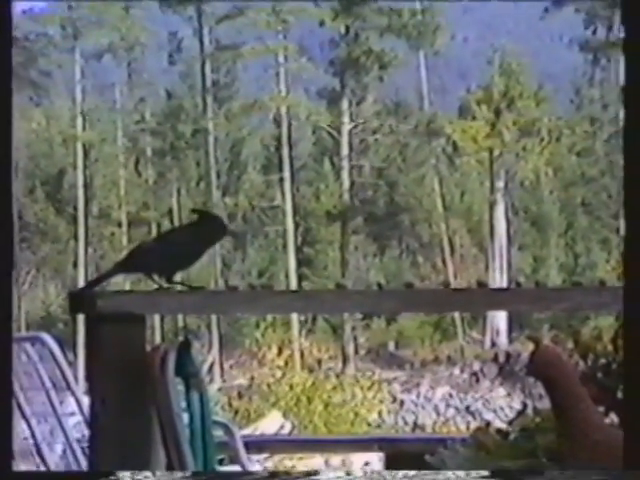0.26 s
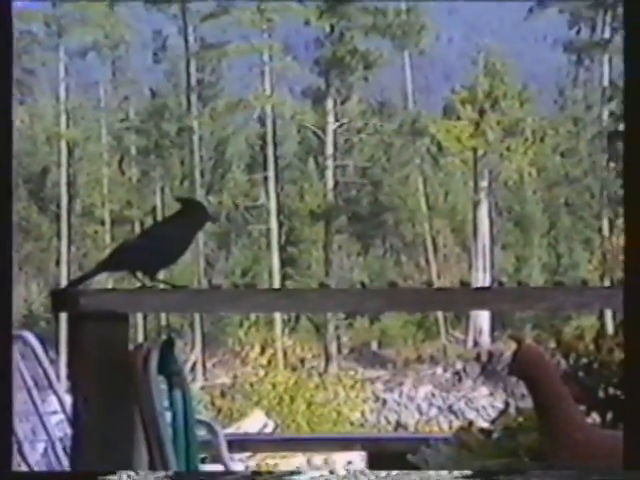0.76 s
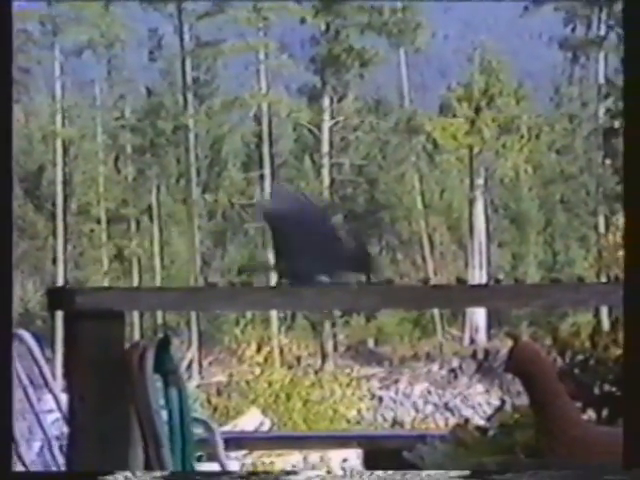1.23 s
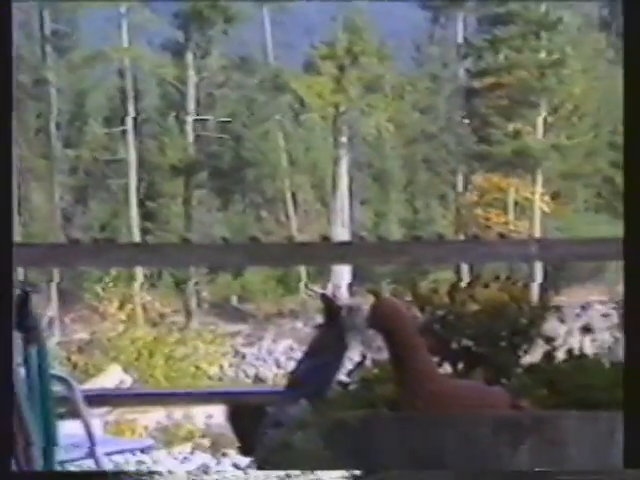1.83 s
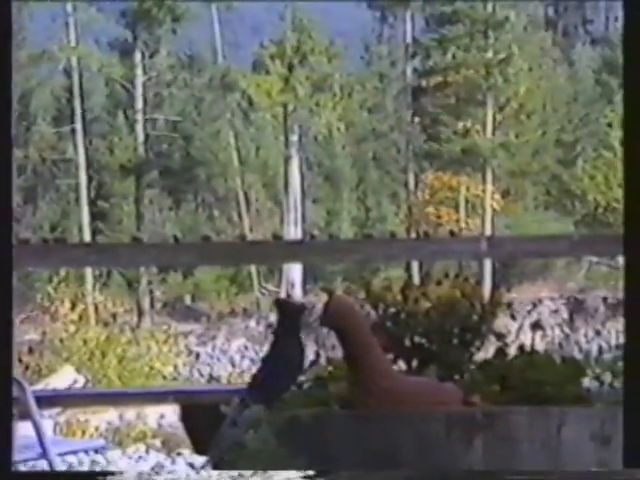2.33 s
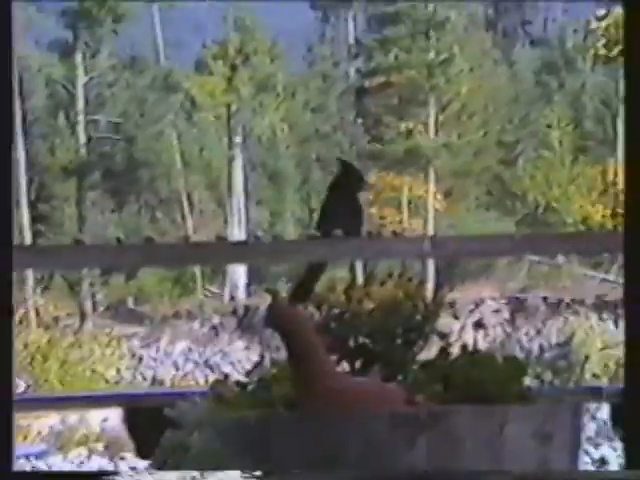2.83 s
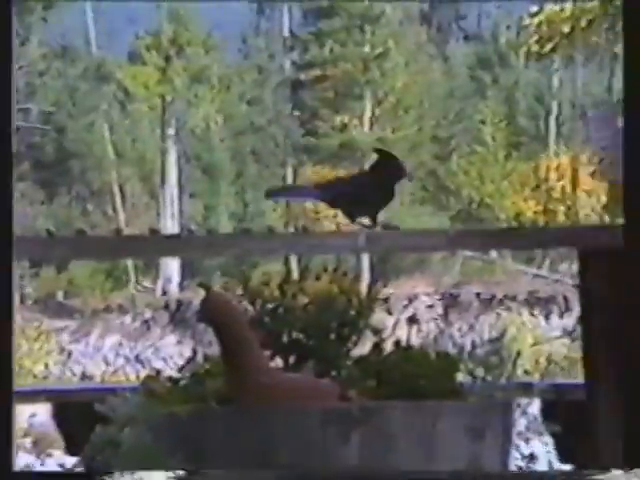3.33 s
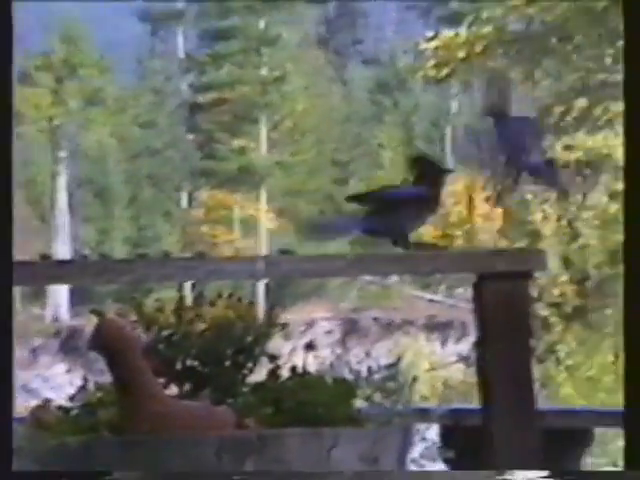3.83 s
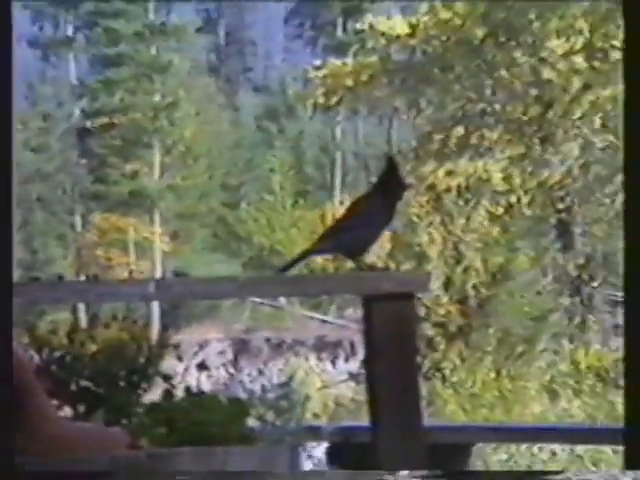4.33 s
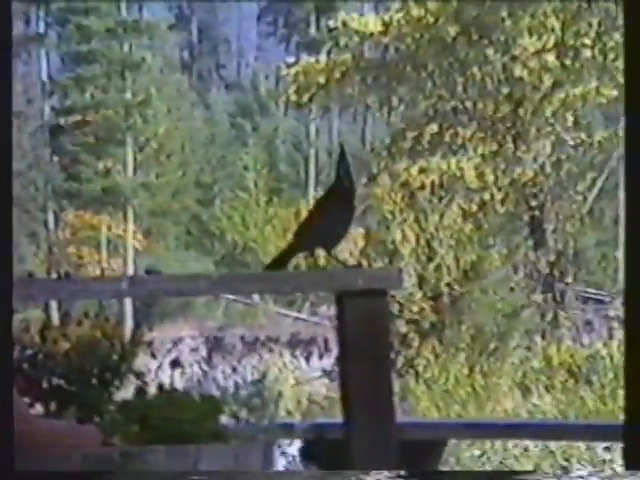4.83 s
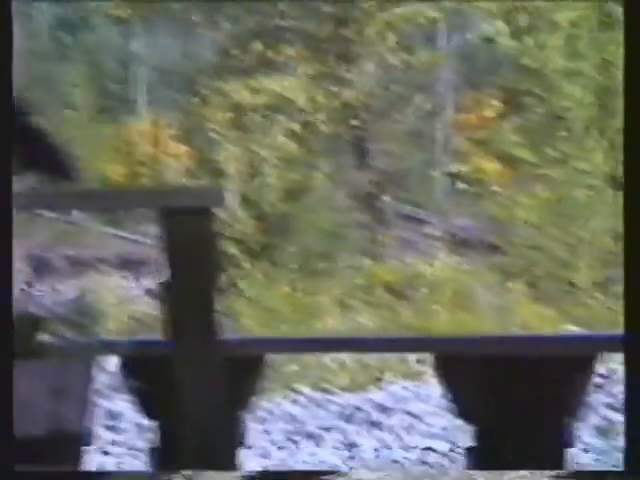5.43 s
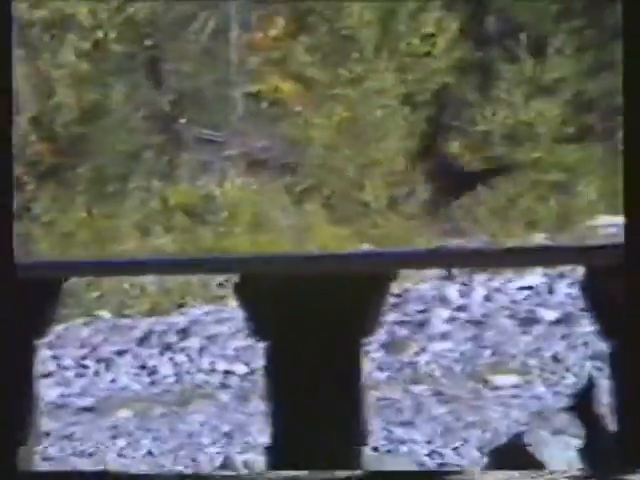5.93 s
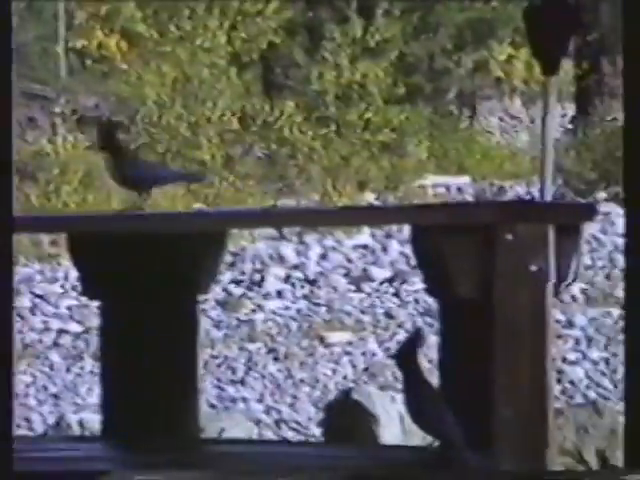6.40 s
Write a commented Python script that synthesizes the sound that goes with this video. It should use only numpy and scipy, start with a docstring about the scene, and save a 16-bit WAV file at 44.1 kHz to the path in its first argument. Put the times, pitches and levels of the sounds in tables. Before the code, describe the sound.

A deck beside a forest, heard through an old tape camera: low wavering hum, thin buzz, soft breathy wash of trees and steady hiss, almost entirely in the right channel, with only very faint electronic hiss and thin tones on the left. At 1.3 seconds a jay gives a quarter-second raspy call that grows stronger, followed at 1.5 by a short, duller chirp. A soft low bump comes around 2.3, and more handling thumps follow from 3.2. A small claw tick at 3.45 and a brief low moan lead into a harsh rattling call at 3.6, about 0.3 seconds long. The moan returns near 4.2, with a bump and a tiny tick at 4.4. Two more rasps follow at 5.0 and 5.55, whistle-edged, falling at the end, with slight echo. A bump comes at 5.9, a clearer claw tick at 6.1, then hum and hiss continue to 6.6.

```python
"""A deck rail before a forest: a jay on the rail gives four raspy calls and one short chirp.
Each call is a whistle with its octave, and a rattle at a tenth of its pitch ringing through the throat.
Claws tick on the wood as short decaying modes; hands bump the camera body as low swelling tones.
The old tape camera hums, buzzes and whines in tones; noise makes the soft forest wash and the hiss.
Only the right track carries the microphone; the left holds faint electronics hiss and thin tones."""
import sys
import numpy as np
from scipy import signal
from scipy.fft import rfft, irfft, next_fast_len
from scipy.io import wavfile

SR = 44100
rng = np.random.default_rng(int(sys.argv[2]) if len(sys.argv) > 2 else 0)


def dump(signal):
    """Clip the signal to [-1, 1] and save it as 16-bit WAV at the path in sys.argv[1]."""
    limited = np.clip(np.atleast_2d(signal).T, -1, 1)
    pcm = np.round(limited * 32767).astype(np.int16)
    wavfile.write(sys.argv[1], SR, pcm)


N = 293926  # length in samples
# Microphone levels below are in dB before scene() doubles that track.


def gain_of(db):
    """Decibels to gain."""
    return 10 ** (np.asarray(db) / 20)


def evened(x):
    """Scales to rms 1."""
    return x / np.sqrt(np.mean(x ** 2) + 1e-20)


def add(mix, s, sound):
    """Mixes a sound in at s seconds."""
    part = mix[round(s * SR):][:len(sound)]
    part += sound[:len(part)]


def whole(rows):
    """Columns of a timed table as curves over the full length."""
    s, *columns = np.transpose(rows)
    return [np.interp(np.arange(N) / SR, s, c) for c in columns]


def coloured(x, points):
    """Shapes x by a (frequency [Hz], level [dB]) spectrum, interpolated over log frequency."""
    hz, db = np.transpose(points)
    n = next_fast_len(len(x) + 512)
    log_hz = np.log(np.fft.rfftfreq(n, 1 / SR) + 1)
    gain = gain_of(np.interp(log_hz, np.log(hz), db))
    return irfft(rfft(x, n) * gain, n)[:len(x)]


def wander(n, rate_hz):
    """Smooth chance up to rate_hz, rms 1."""
    b, a = signal.butter(2, rate_hz, fs=SR)
    noise = rng.standard_normal(n + SR)
    return evened(signal.lfilter(b, a, noise)[SR:])  # the first second lets the filter settle


def resonate(x, hz, width):
    """Shifts the curve hz down to zero, smooths twice and shifts back: a steep resonance of gain 1."""
    turn = np.exp(2j * np.pi * np.cumsum(hz * np.ones(len(x))) / SR)
    r = np.exp(-np.pi * width / SR)
    smoothed = signal.lfilter([(1 - r) ** 2], [1, -2 * r, r * r], x / turn)
    return 2 * (turn * smoothed).real


def tone(hz):
    """Sine of rms 1 on a pitch curve, from a random phase."""
    return np.sqrt(2) * np.sin(2 * np.pi * (np.cumsum(hz) / SR + rng.random()))


# The jay on the rail, one row a call: (time [s], length [s], rasp level [dB], swell [s],
# opening snap [dB re rasp], rasp drift [dB/s], top pitch [Hz], final pitch fall [share],
# whistle delay [s], whistle level [dB], octave level [dB], treble [dB per 1.7 kHz above 4.3 kHz],
# beak opening [s], low rings at the start [dB], throat tuning at the start [factor],
# broad rasp [dB re rings], noise in the rattle [share 0-1])
CALLS = [ (1.3, 0.24, -40, 0.03, -14, 19, 1196, 0.097, 0.064, -47, -52, -1.5, 0.022, 0, 0.88, -0.5, 0.38),
         (1.491, .112, -40, .012, -18, -10, 1137, .1, .03, -60, -52, -18, .01, 8, 0.9, -1.5, 0.5),
         (3.582, .31, -33.5, 0.039, -9, -9, 1198, 0.19, 0.04, -45, -48, -4, 0.014, 5, 1, -2, 0.45),
         (4.968, .31, -31, 0.041, -31, -18, 1169, .18, 0.027, -46.5, -49.5, -6, 0.051, 18.5, 0.91, -1, .35),
         (5.548, 0.32, -33, 0.034, -21, -14, 1187, 0.21, 0.029, -49, -44.5, -3, 0.073, 8, 1, 0, 0.47), ]
# Throat and beak as each call faces the microphone, one list a call:
# (frequency [Hz], width setting [Hz, sounding 2.83 times as wide plus 90], level [dB])
THROAT_RINGS = [
    [(1610, 22, 2), (1940, 170, 7), (2340, 80, 6), (3030, 35, 6), (3610, 87, 9.5), (4100, 65, 2),
     (4460, 30, -20), (5150, 82, -16), (5500, 130, -14), (6680, 130, -3), (7800, 40, -10)],
    [(1950, 36, -9), (3500, 60, -4), (3940, 66, 3), (4130, 61, -2), (4970, 150, -20)],
    [(1640, 210, -12), (2050, 34, -15), (2200, 40, -3), (2440, 56, -5), (2880, 130, -7), (3440, 103, 5),
     (3850, 220, 5.5), (4900, 84, -4), (5320, 36, -2), (5600, 36, -9), (5970, 85, -10)],
    [(1700, 74, -9), (2100, 70, -8), (2360, 29, -5), (2510, 21, -12), (3305, 18, 5), (3610, 18, 4),
     (3930, 200, 7), (4530, 74, -6), (4980, 130, 0), (5410, 81, 0), (5900, 160, -6)],
    [(1790, 38, -25), (2000, 16, -27), (2307, 46, -1), (2760, 67, -9), (3395, 130, 5), (3760, 130, 6.5),
     (4120, 150, 4.5), (5060, 400, -2.5), (5450, 65, -8), (5950, 51, -15), (7000, 110, -28)],
]


def jay():
    """All calls, with the short echo of cabin wall and trees as decaying noise."""
    direct = np.zeros(N)
    for (s, *shape, tuning_start, broad_db, noise_share), throat in zip(CALLS, THROAT_RINGS):
        add(direct, s, call(throat, shape, tuning_start, broad_db, noise_share))
    t = np.arange(SR // 2) / SR
    tail = rng.standard_normal(len(t)) * gain_of(-60 * t / 0.43)  # falls 60 dB in 0.43 s
    tail *= t > .012  # first return after 12 ms
    echo = signal.oaconvolve(direct, tail / np.linalg.norm(tail))[:N]
    return direct + gain_of(-16.5) * echo


def call(throat, shape, tuning_start, broad_db, noise_share):
    """A whistle with its octave, and a rattle on every tenth cycle of it that rasps through the throat."""
    rasp_db, hz, whistle_db, octave_db, *colour = phrasing(*shape)
    n = len(hz)
    t = np.arange(n) / SR
    turns = np.cumsum(hz * (1 + 0.0078 * wander(n, 117))) / SR
    flaps = turns / 10 + .6 * (1 - np.exp(-t / 0.03086))  # the rattle starts a little faster
    flaps += 0.0096 * wander(n, 92.4)
    blur = np.clip((t / 0.035) ** 2, .22, 1)  # the first flaps are separate snaps, later ones smear
    voice = whistle(t, turns, flaps, whistle_db, octave_db)
    drive = rattle(t, flaps, blur, noise_share)
    rasp = beak(throat_rasp(t, drive, throat, tuning_start, broad_db), *colour)
    rasp = evened(rasp) * gain_of(rasp_db + 0.41 * wander(n, 48))
    return (np.sqrt(2) * blur * voice + rasp) * signal.windows.tukey(n, .05)


def whistle(t, turns, flaps, whistle_db, octave_db):
    """Pitch and octave, pulsed by the rattle, which adds side tones."""
    n = len(t)
    sound = gain_of(whistle_db + 2.2 * wander(n, 25)) * np.cos(2 * np.pi * turns)
    sound += gain_of(octave_db + 1.34 * wander(n, 32)) * np.cos(4 * np.pi * turns)
    sound *= 1 + 0.41 * np.cos(2 * np.pi * flaps)
    return sound * np.clip((t[-1] - t - .008) / .03, 0, 1)  # it dies before the rasp does


def rattle(t, flaps, blur, noise_share):
    """Flickering multiples 12 to 75 of the flap rate, mixed with a noisy puff at each flap."""
    knots = np.arange(0, t[-1] + .03, .03)
    flicker_db = 4 * rng.standard_normal((len(knots), 64))
    spread = rng.uniform(-np.pi, np.pi, 64)
    partials = np.zeros(len(t))
    for k in range(64):
        gain = gain_of(np.interp(t, knots, flicker_db[:, k]))
        partials += gain * np.cos(2 * np.pi * (k + 12) * flaps + blur * spread[k])
    puffs = (3.4 * blur + np.exp(-(flaps % 1) / 0.23)) * rng.standard_normal(len(t))
    return (1 - noise_share) * evened(partials) + noise_share * evened(puffs)


# Broad rasp around the throat rings: (frequency [Hz], relative level [dB per Hz])
BROAD_RASP = [(740, -51), (1250, -40), (1320, -7), (1700, -1.5), (2120, -0.5), (2320, -17), (2610, -1),
              (3080, 2.5), (3290, 2.5), (3910, -9.5), (4530, -0.5), (5570, -0.5), (9000, -19.5),
              (11700, -69), (19800, -120)]


def throat_rasp(t, drive, throat, tuning_start, broad_db):
    """The rattle rings the throat, whose tuning settles from its start value, over a broad rasp."""
    tuning = 1 - (1 - tuning_start) * np.exp(-(t / 0.036) ** 2) + 0.0063 * wander(len(t), 8)
    rings = sum(gain_of(db) * resonate(drive, f * tuning, 2.83 * w + 90) for f, w, db in throat)
    return evened(rings) + gain_of(broad_db) * evened(coloured(drive, BROAD_RASP))


def beak(rasp, treble_db, ring_db, low_db):
    """A half-shut beak dulls the highest bands first; the moving tongue shifts weight between rings."""
    n = len(rasp)
    t = np.arange(n) / SR
    f, frames, z = signal.stft(rasp, SR, nperseg=256)
    f = f[:, None]
    opening_db = np.minimum(np.interp(frames, t, treble_db), .5)
    z *= gain_of(np.clip((f - 4300) / 1700, 0, 2.5) * opening_db)
    for db, centre_hz, reach_hz in ((ring_db, 3300, 350), (low_db, 2000, 750)):
        band = np.exp(-((f - centre_hz) / reach_hz) ** 4)
        z *= gain_of(band * np.interp(frames, t, db))
    return signal.istft(z, SR, nperseg=256)[1][:n]


SWELL_DB, RELEASE_S, RELEASE_DB = -30.5, 0.044, -21.5  # the rasp swells up and drops away at the end
SNAP_S, SNAP_WIDTH_S = 0.016, 0.0069  # a short burst as the voice breaks in
# pitch arch: place of the top (share of length), share below it at the start, sharpness of the fall
CREST, START_FLAT, FALL_BEND = .45, .14, 2.6
OCTAVE_FLAT_DB = -110  # the octave weakens off the pitch top: dB per unit share of pitch lost
WHISTLE_FROM_DB, OCTAVE_LATER = -13, 1.9  # whistle comes in late, its octave later by this factor
SHUT_DB = -29  # treble lost while the beak is still shut, per 1.7 kHz above 4.3 kHz
RING_START_DB, RING_END_DB, RING_BEND = 0.5, -8.5, 5.3  # the 3.3 kHz ring fades towards the end
LOW_START_S, LOW_END_DB = 0.043, 12  # low rings stand out at the start and again in the release


def phrasing(length, top_db, swell, snap_db, drift_db, top_hz, fall,
             delay, whistle_db, octave_db, treble_db, opening, low_db):
    """How level, pitch and colour move through one call."""
    t = np.arange(0, length, 1 / SR)
    u = t / length
    ending = np.clip(1 - (length - t) / RELEASE_S, 0, 1) ** 2
    effort = gain_of(SWELL_DB * np.exp(-t / swell) + drift_db * (t - length / 2) + RELEASE_DB * ending)
    effort += gain_of(snap_db) * np.exp(-((t - SNAP_S) / SNAP_WIDTH_S) ** 2)
    flat = START_FLAT * np.clip(1 - u / CREST, 0, 1) ** 2
    flat += fall * np.clip((u - CREST) / (1 - CREST), 0, 1) ** FALL_BEND
    late_db = WHISTLE_FROM_DB * np.exp(-(t / delay) ** 4)
    later_db = WHISTLE_FROM_DB * np.exp(-(t / (OCTAVE_LATER * delay)) ** 4)
    return (top_db + 20 * np.log10(effort),
            top_hz * (1 - flat),
            whistle_db + late_db,
            octave_db + later_db + OCTAVE_FLAT_DB * flat,
            treble_db + SHUT_DB * np.exp(-(t / opening) ** 2),
            RING_START_DB + (RING_END_DB - RING_START_DB) * u ** RING_BEND,
            low_db * np.exp(-t / LOW_START_S) + LOW_END_DB * ending)


# Claws on the wood: (time [s], peak level [dB], ring time to -60 dB [s],
# best-excited pitch [Hz], loss of modes an octave away from it [dB])
CLAW_TICKS = [(3.456, -40, 0.015, 2500, -7), (4.4086, -36, 0.007, 3530, -40),
              (6.0847, -26, 0.018, 4700, -2)]
# Modes of the deck rail: (frequency [Hz], relative level [dB])
RAIL_MODES = [(1200, 1.5), (3270, -5), (3920, -5), (4200, -4.5), (4840, -1), (5300, -6), (7900, -16)]


def claw_ticks():
    """Each tick rings the rail's modes briefly, strongest near its best-excited pitch."""
    out, t = np.zeros(N), np.arange(2000) / SR
    for s, db, ring_s, best_hz, loss_db in CLAW_TICKS:
        ring = np.zeros(len(t))
        for hz, level in RAIL_MODES:
            gain = gain_of(level + loss_db * np.log2(hz / best_hz) ** 2)
            ring += gain * np.sin(2 * np.pi * (hz * t + rng.random()))
        ring *= gain_of(-60 * t / ring_s) * np.minimum(t / 0.00033, 1)
        add(out, s, gain_of(db) * ring / abs(ring).max())
    return out


# Hands on the camera body: (time [s], sounding from 15 ms before; peak level [dB],
# frequency [Hz], length [s])
BODY_BUMPS = [(2.337, -45.5, 143.4, 0.17), (3.188, -36.5, 141.1, 0.058), (3.277, -42, 161, 0.091),
              (3.424, -46, 134, 0.07), (3.89, -41.5, 170, 0.048), (4.283, -31.5, 140, 0.079),
              (4.903, -39.5, 136, 0.062), (5.87, -41.5, 136.6, 0.081)]


def body_bumps():
    """Low tones that swell and fade in the camera body."""
    out = np.zeros(N)
    for s, db, hz, length in BODY_BUMPS:
        n = round(length * SR)
        thud = np.hanning(n) * np.sin(2 * np.pi * hz * np.arange(n) / SR)
        add(out, s - .015, gain_of(db) * thud)
    return out


# Low wavering drone at the camera: (time [s], level [dB])
DRONE_LEVEL = [(0.0, -55.5), (0.5, -60.5), (2.2, -58), (3.4, -55.5), (3.7, -58), (4.2, -55), (4.6, -58),
               (5.15, -56.5), (5.4, -49.5), (5.8, -50.5), (6.1, -57), (6.66, -48.5)]


def drone():
    """A tone near 133 Hz, wavering in pitch and strength."""
    waver = evened(wander(N, 9.1) + 1.4)
    return gain_of(whole(DRONE_LEVEL)[0]) * waver * tone(133.1 + 3.2 * wander(N, 11.7))


# A low moan: (time [s], level [dB], pitch [Hz])
MOAN_CURVE = [(3.38, -95, 104.7), (3.49, -49.5, 110.5), (3.58, -67, 112.3), (3.88, -61, 104),
              (4.05, -54, 106.6), (4.2, -50.5, 109), (4.3, -95, 107)]


def moan():
    """A low tone that follows the pitch and level curve."""
    db, hz = whole(MOAN_CURVE)
    return gain_of(db + 1.1 * wander(N, 3.3)) * tone(hz)


# Tape motor hum, which drops out now and then: (time [s], level of the lowest tone [dB])
MOTOR_LEVEL = [(0.0, -55), (0.25, -75), (0.55, -58.5), (1.3, -57.5), (2.05, -56), (2.3, -66), (2.6, -76),
               (2.75, -55.5), (3.6, -53.5), (4.8, -60.5), (5.05, -67), (5.35, -57.5), (6.2, -57),
               (6.47, -73)]


def motor_hum():
    """A slightly unsteady 180 Hz tone with its second and third harmonics."""
    hz = 180. + 0.88 * wander(N, 4.9)
    hum = tone(hz) + gain_of(-9) * tone(2 * hz) + gain_of(-8) * tone(3 * hz)
    return gain_of(whole(MOTOR_LEVEL)[0] + 1.1 * wander(N, 7.2)) * hum


DRUM_HZ = 29.988  # turns of the head drum per second


def drum_hum():
    """A faint low tone at twice the drum rate."""
    return gain_of(-74 + 1.5 * wander(N, 10.0)) * tone(np.full(N, 2 * DRUM_HZ))


def drum_buzz(drum_hz):
    """Multiples of eight drum turns, the odd ones and every sixth, with side tones one turn away."""
    buzz = np.zeros(N)
    for k in range(25, 64):
        if k % 2 or k % 6 == 0:
            level_db = -88 - .38 * max(k - 43, 0)  # even up to multiple 43, then falling
            buzz += gain_of(level_db) * tone(8 * k * drum_hz)
    return (1 + 0.64 * tone(drum_hz)) * buzz


# Scan whine: (time [s], frequency [Hz], level [dB, played 1.5 dB lower])
SCAN_WHINE = [(3.75, 15744, -73), (3.9, 15722, -71), (4.5, 15700, -71), (5, 15686, -71)]
# Tones one to four drum turns below the whine: (level [dB re whine])
SCAN_SIDE_TONES = [-14, -11, -15, -19]


def scan_whine(drum_hz):
    """A very high sliding tone with side tones spaced by the drum rate below it."""
    hz, db = whole(SCAN_WHINE)
    whine = tone(hz)
    for turns, side_db in enumerate(SCAN_SIDE_TONES, 1):
        whine += gain_of(side_db) * tone(hz - turns * drum_hz)
    return gain_of(db - 1.5 + 1.9 * wander(N, 6)) * whine


def fizz():
    """Narrow noise around 10.68 kHz, slowly varying in level."""
    noise = evened(resonate(rng.standard_normal(N), 10680, 200))
    return gain_of(-80 + 3 * wander(N, 1.2)) * noise


def camera():
    """Everything the running tape camera adds; buzz and whine share one slightly unsteady drum rate."""
    drum_hz = DRUM_HZ * (1 + .00005 * wander(N, 2.8))
    hums = drone() + moan() + motor_hum() + drum_hum()
    return hums + drum_buzz(drum_hz) + scan_whine(drum_hz) + fizz()


# Forest and tape hiss: (frequency [Hz], relative level [dB per Hz])
WASH_SPECTRUM = [(120, -25), (200, -3.5), (263, -3.5), (304, -2), (463, -4), (526, -2.5), (716, -4),
                 (814, -3.5), (1280, -9.5), (2660, -26), (4120, -19), (6620, -27.5), (10600, -30),
                 (14500, -33.5), (15600, -37)]
# The microphone's low end, strongest at 130 Hz: (frequency [Hz], relative level [dB])
MIC_BASS = [(20, -10), (45, -6), (75, 0.5), (100, 4.5), (130, 11.5), (200, -11.5)]
# Wash below about 2 kHz: (time [s], level [dB])
BREEZE_LEVEL = [(0.0, -49.5), (0.68, -49), (1.43, -46), (3.5, -48), (4.2, -48.5), (5.8, -49), (6.66, -48.5)]


def wash():
    """Wind in the trees swells below 2 kHz; the hiss above stays steady."""
    noise = coloured(rng.standard_normal(N), WASH_SPECTRUM + [(15601, -28)])
    noise = coloured(noise, MIC_BASS)
    level_db, = whole(BREEZE_LEVEL)
    body = coloured(noise, [(1600, 0), (2600, -40)])
    hiss = gain_of(np.median(level_db) + 1.04) * (noise - body)
    breeze = gain_of(level_db + 0.46 * wander(N, 8.6)) * body
    return (breeze + hiss) / np.std(body)


# Electronics hiss of the unused left track: (frequency [Hz], relative level [dB per Hz])
DEAD_SPECTRUM = [(20, -2), (1500, 4), (6000, 1), (15000, -3.5), (15300, -9)]


def dead_track():
    """Hiss and a thin whine of the electronics."""
    whine = np.zeros(N)
    for hz, db in [(720, -91.5), (1440, -97), (2880, -102), (3600, -103)]:
        whine += gain_of(db) * tone(np.full(N, hz))
    return gain_of(-76) * evened(coloured(rng.standard_normal(N), DEAD_SPECTRUM)) + whine


def scene():
    """The microphone goes to the right track only, at twice the level."""
    microphone = jay() + claw_ticks() + body_bumps() + camera() + wash()
    return np.array([dead_track(), 2 * microphone])


def record(dry):
    """A steep low-pass limits the band on both tracks."""
    lowpass = signal.firwin(2047, 15765, window=("kaiser", 8), fs=SR)  # edge in Hz
    return signal.oaconvolve(dry, lowpass[None], "same")


dry = scene()
out = record(dry)
dump(out)
```